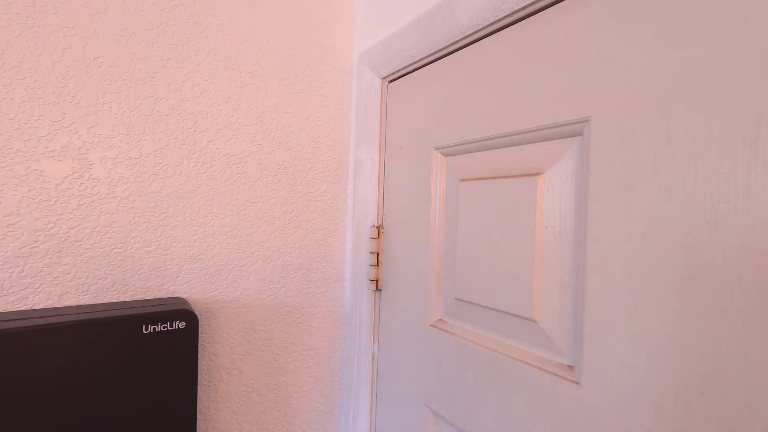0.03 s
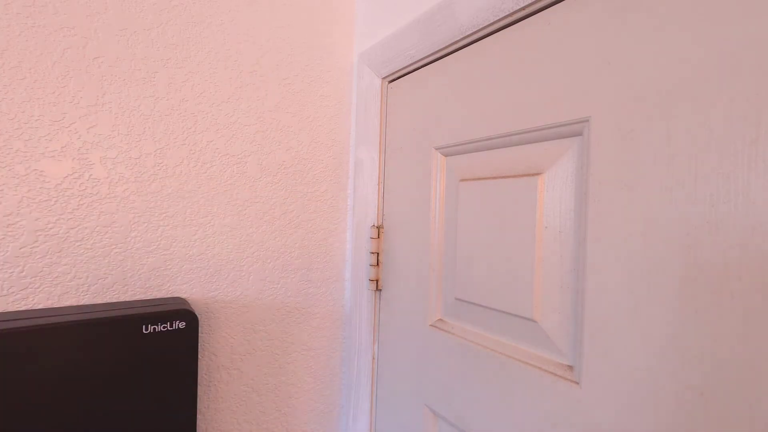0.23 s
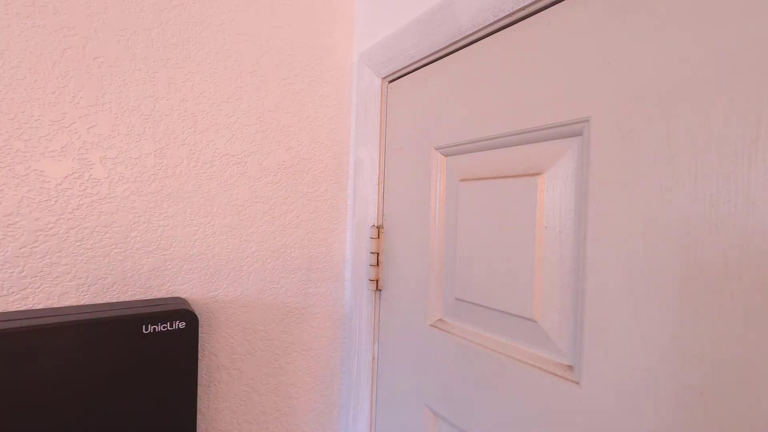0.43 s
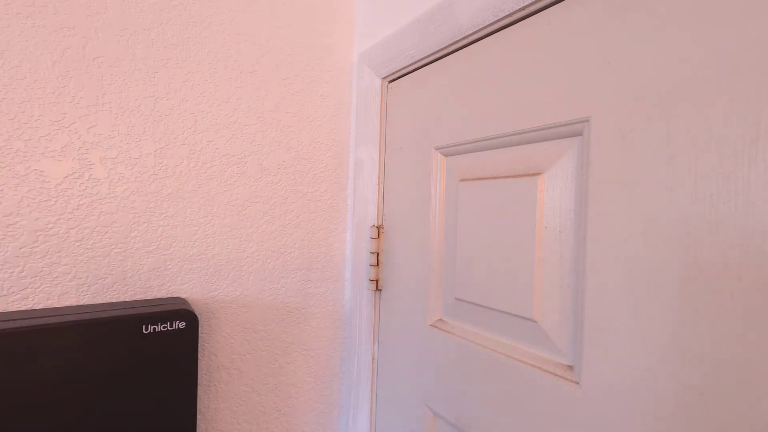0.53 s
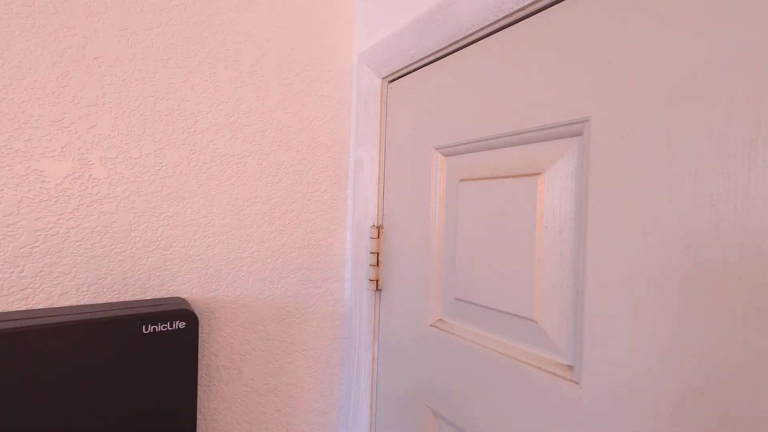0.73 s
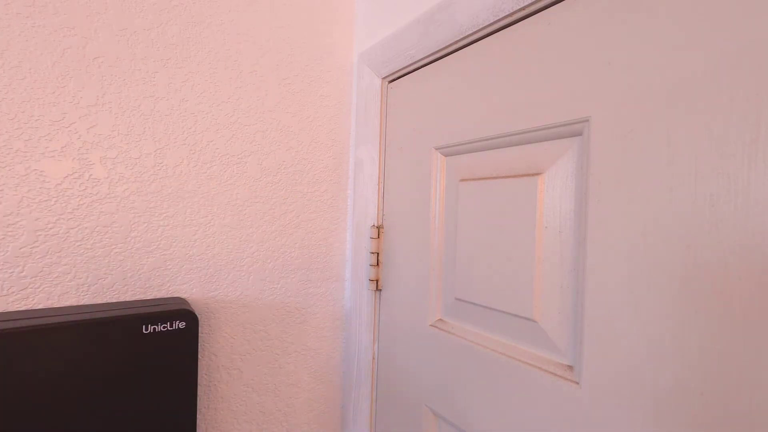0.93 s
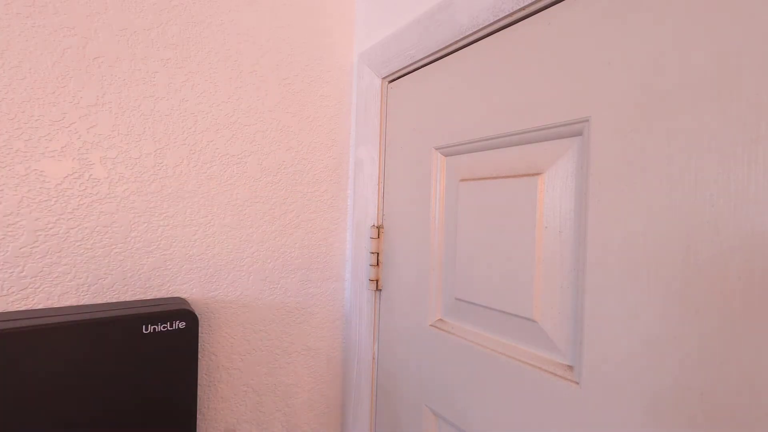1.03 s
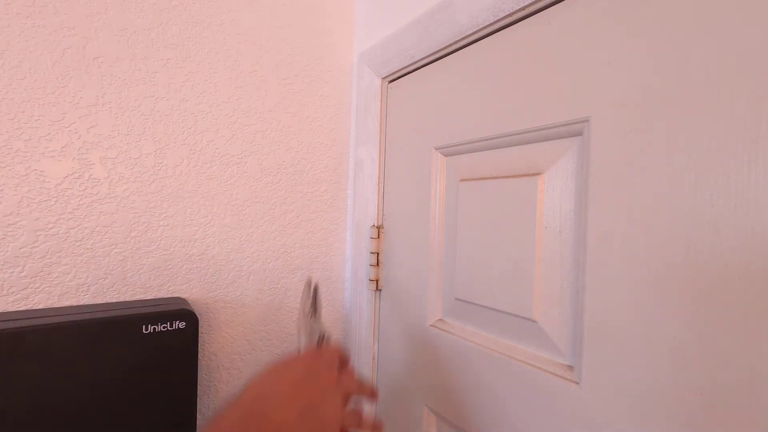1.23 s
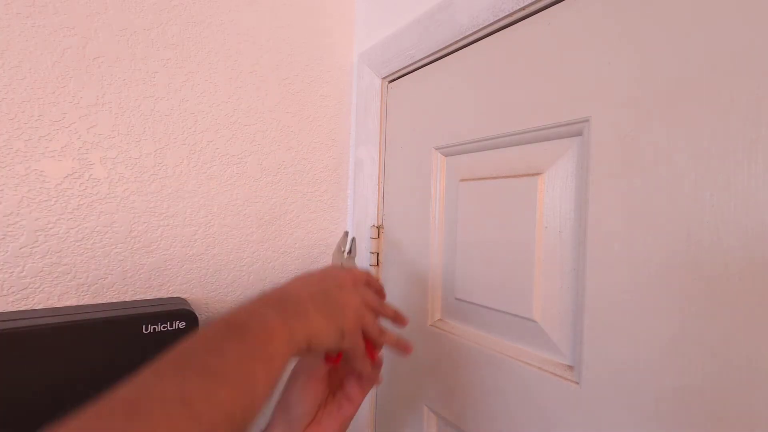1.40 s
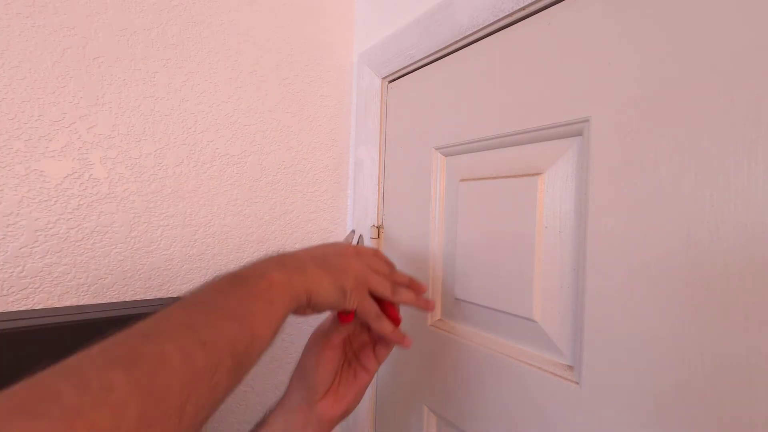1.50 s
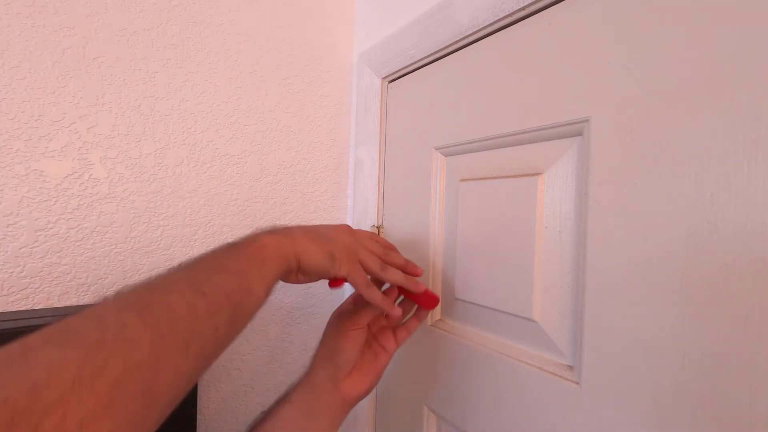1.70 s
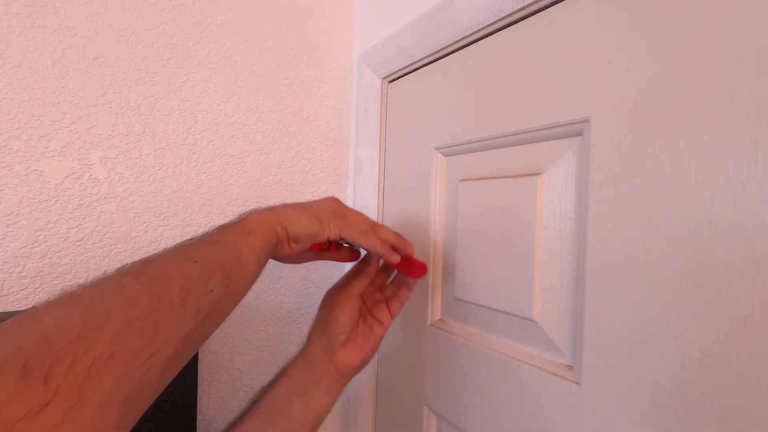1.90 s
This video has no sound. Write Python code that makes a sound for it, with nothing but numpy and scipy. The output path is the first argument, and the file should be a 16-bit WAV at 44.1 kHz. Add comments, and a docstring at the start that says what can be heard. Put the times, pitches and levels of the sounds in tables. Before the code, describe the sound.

A spring-loaded hand tool snaps with a hard clack at about 0.25 seconds. Wooden knocks and steel clinks rattle after it, settling with a short scrape around 0.5 seconds. Faint handling ticks follow. At 1.6 seconds the tool snaps again on a door hinge, brighter and more metallic, with one soft rebound click. The small room has a short echo and faint hiss and rumble.

```python
"""A small quiet room, where a spring-loaded hinge pin tool snaps twice over faint hiss and rumble.
The first snap is out of sight: the spring lets go and the parts slap together in a hard clack. Wooden
knocks, steel clinks and a short rattle follow, settle with a scrape and a groan, and leave a faint wash.
After a few handling ticks and a brief hiss the tool snaps on the door hinge, brighter, with one rebound.
The big hits layer the ringing modes of steel or wood with a crack of contact noise and the room's echo."""
import sys
import numpy as np
from scipy import signal
from scipy.fft import rfft, irfft
from scipy.io import wavfile

SR = 44100
rng = np.random.default_rng(int(sys.argv[2]) if len(sys.argv) > 2 else 0)


def to_wav(sig):
    """Store sig (one row per channel, or 1-D mono) as 16-bit WAV at the path in sys.argv[1].

    Samples outside -1..1 are clipped; the rate is SR.
    """
    pcm = np.clip(np.atleast_2d(sig), -1, 1) * 32767
    pcm = np.round(pcm).astype(np.int16)
    wavfile.write(sys.argv[1], SR, pcm.T)  # frames by channels


N = 85995

# How long the room rings. Each row: frequency in Hz, time to fall 60 dB (t60) in seconds.
ROOM_T60 = [(100, 0.0064), (500, 0.2561), (1200, 0.3178), (2500, 0.299), (3600, 0.26), (5100, 0.255),
            (6000, 0.28), (6700, .262), (7600, 0.262), (8500, 0.23), (11000, 0.2089), (15000, 0.167)]
# The colour of its echoes. Each row: frequency in Hz, relative gain in dB.
ROOM_COLOUR = [(100, -5), (700, 1), (1500, -1.5), (2500, -1), (4200, 1), (6000, 5.5), (6800, 2.5),
               (7600, 4), (10000, 3.5), (15000, -2)]

# The room's hiss. Each row: frequency in Hz, relative gain in dB.
HISS_COLOUR = [(20, 2.5), (60, -8), (150, -15.5), (400, -18.5), (1200, -17.5), (1900, -25.5), (2800, -18.5),
               (4000, -26.5), (10000, -31), (16000, -44)]
# The hiss ebbs slowly. Each row: time in seconds, level in dB.
HISS_FADER = [(0, -72), (.14, -77.5), (1.4, -82), (1.95, -82)]
# Deep rumble. Each row: frequency in Hz, relative gain in dB.
RUMBLE_COLOUR = [(1, 3), (8, -12), (25, -30.5), (60, -40), (120, -54), (400, -91)]
# The rumble grows as the hands approach. Each row: time in seconds, level in dB.
RUMBLE_FADER = [(0, -65), (.6, -64), (.66, -55), (1.3, -47.5), (1.95, -46)]
# The wash left by the first snap. Each row: frequency in Hz, relative gain in dB.
WASH_COLOUR = [(40, 1.5), (90, -1), (170, -7.5), (250, -13.5), (330, -8.5), (550, -7.5), (800, -13.5),
               (1150, -12), (1730, -6.5), (2800, -22.5), (4500, -18), (5400, -30.5), (11000, -41),
               (15000, -55.5)]
# The wash comes up quickly and lingers. Each row: time in seconds, level in dB.
WASH_FADER = [(.2, -100), (.36, -62.5), (.7, -67), (1.18, -76), (1.42, -87), (1.95, -100)]

# Handling ticks of the tool. Each row: start in seconds, relative level in dB.
TICKS = [(0.155, -60), (.499, -68.5), (.829, -56), (1.036, -65.5), (1.069, -54.5), (1.076, -59),
         (1.191, -58.5), (1.307, -66), (1.328, -62), (1.502, -63.5)]
# Contact noise of a tick. Each row: frequency in Hz, relative gain in dB.
TICK_COLOUR = [(200, -16), (900, -16.5), (1400, -7.5), (2100, 2.5), (2700, -2.5), (4300, -1.5),
               (7000, -13.5), (12000, -15), (16000, -21)]
# Soft bumps of the hands on the door. Each row: start in seconds, relative level in dB.
HAND_BUMPS = [(.09, -60.5), (0.801, -57), (1.604, -41.5), (1.694, -58.5)]
# The low thud of a bump or knock. Each row: frequency in Hz, relative gain in dB.
THUD_COLOUR = [(25, -16.5), (58, 0.5), (110, -6.5), (190, -4.5), (300, -13), (400, -19), (520, -16),
               (900, -26.5), (3000, -58.5)]
# Faint thin rings of the tool. Each row: start in seconds, pitch in Hz, level in dB, t60 in seconds.
THIN_RINGS = [(1.249, 1275, -78.5, 0.56), (1.77, 796, -86, 2.26)]

# The faint hiss just before the second snap. Each row: frequency in Hz, relative gain in dB.
PRE_SNAP_COLOUR = [(200, -27), (1000, -18), (1400, -5.5), (2100, 4.5), (2700, -12), (3400, -2),
                   (4500, -2.5), (6500, -17.5), (10000, -24), (16000, -36)]
# The groan of settling wood. Each row: frequency in Hz, relative gain in dB.
GROAN_COLOUR = [(60, -29), (140, -22.5), (190, -6.5), (310, 5.5), (400, -6.5), (500, 3.5), (700, -19),
                (2000, -43.5)]
# Wood scraping as the rattle settles. Each row: frequency in Hz, relative gain in dB.
SCRAPE_COLOUR = [(60, -33), (200, -17), (550, -23.5), (750, 1.5), (1000, 2.5), (1250, 3), (1600, -3),
                 (1950, -33.5), (3000, -25.5), (5000, -41.5), (12000, -58)]

# Loose steel parts landing. Each row: start in seconds, relative level in dB.
CLINKS = [(0.3066, -17), (0.3189, -22.5), (.333, -29.5), (.401, -41), (0.4236, -32)]
# The ring of the loose steel. Each row: frequency in Hz, relative level in dB, t60 in seconds.
STEEL_MODES = [(2680.5, -2.5, .025), (3760, 0, 0.025), (3890, -1, .025), (5750, -9, .025), (6730, -6, 0.02),
               (7170, -11, .025), (7560, -10, .025), (9200, -23, .025), (10090, -20, .02)]

# Knocks on wood, ending in a rattle. Each row: start in seconds, relative knock and thud levels in dB.
KNOCKS = [(.2425, -23, -25.5), (.254, -20.5, -32.5), (.2785, -13.5, -30.5), (.2808, -11, -29.5),
          (.2895, -15, -28.5), (.3075, -22.5, -43.5), (.3288, -19, -44.5), (.3545, -21.5, -45),
          (.369, -25.5, -68), (.392, -33, -73.5), (.411, -33, -72), (0.4476, -30.5, -67), (.469, -33, -70),
          (.502, -32.5, -58.5), (.510, -33, -60)]
# The ring of the wood. Each row: frequency in Hz, relative level in dB, t60 in seconds.
WOOD_MODES = [(787.1, -14, 0.075), (848.5, -3.5, 0.043), (1161, 1.5, 0.028), (1311.1, 3.5, 0.027),
              (1561.9, -6, 0.017), (2720, -17.5, 0.023)]
# Contact noise of a knock. Each row: frequency in Hz, relative gain in dB.
KNOCK_COLOUR = [(100, -16), (250, -10), (550, -5.5), (750, -1.5), (1550, 11), (2100, -11.5), (4000, -22),
                (8000, -29), (16000, -55.5)]

# The parts slapping together in the first snap. Each row: start in seconds, relative level in dB.
CLACKS = [(0.2404, -18.5), (0.2418, -8.5), (.2428, -6.5), (.2460, -15.5), (0.2591, -18.5), (0.2753, -18.5)]
# The ring of those parts. Each row: frequency in Hz, relative level in dB, t60 in seconds.
CLACK_MODES = [(756.2, -14, .04), (1280, -12.5, .04), (1603.3, -8, 0.094), (1925.4, -8, 0.044),
               (2381, 3, 0.048), (2598, 0.5, .05), (2754.3, -2, .045), (3144.8, 3, .045),
               (3372, -11.5, .04), (4937, -13.5, 0.058), (5255, -11.5, .025), (9362, -27, .03)]
# Contact noise of a clack. Each row: frequency in Hz, relative gain in dB.
CLACK_COLOUR = [(100, -14), (400, -14.5), (900, -9), (1500, 0.5), (2050, -5.5), (2450, 3.5), (2850, 2.5),
                (3250, 3), (3850, -6.5), (4400, -18.5), (5800, -13), (7600, -19.5), (8400, -28.5),
                (9400, -24), (16000, -44)]

# The catch lets go, then the tool strikes the hinge. Each row: start in seconds, relative level in dB.
HINGE_HITS = [(1.6034, -23), (1.6054, -4.5)]
# The ring of tool against hinge. Each row: frequency in Hz, relative level in dB, t60 in seconds.
HINGE_MODES = [(1394, -17, 0.038), (1671.2, -2.5, 0.0342), (2131, -2, 0.024), (3023, -8.5, .02),
               (3413, -4, 0.025), (4206.5, 2.5, 0.014), (4570, -1, .014), (5268, 0, 0.018),
               (5646, 0, 0.013), (6589, -1.5, 0.015), (7020, -2.5, 0.011), (7504, -2.5, 0.022),
               (11780, -3.5, 0.013), (12640, -7, 0.013), (15400, -4.5, 0.006)]
# Contact noise of that strike. Each row: frequency in Hz, relative gain in dB.
HINGE_COLOUR = [(100, -33), (500, -25.5), (1000, -22.5), (1300, -13.5), (1700, -1.5), (2150, -4.5),
                (2500, -8.5), (3400, 5), (3800, -6), (4400, 1.5), (5100, 0.5), (5900, 2), (7700, 3.5),
                (8500, -8.5), (12000, -8), (16000, -9)]
# The rebound's two quick contacts. Each row: start in seconds, relative level in dB.
REBOUND_HITS = [(1.6569, -22), (1.6600, -29)]
# Contact noise of the rebound. Each row: frequency in Hz, relative gain in dB.
REBOUND_COLOUR = [(100, -41), (900, -40), (1300, -10), (2500, -7.5), (3400, 1), (4500, 1), (6000, -4),
                  (8000, -8), (16000, -20)]


def amp(db):
    """Turns decibels into a gain."""
    return 10 ** (np.asarray(db) / 20)


def unit(x):
    """Scales a sound to an energy of one."""
    return x / np.sqrt(np.sum(x ** 2) + 1e-20)


def read(points, hz):
    """Reads a table on a log-frequency axis."""
    f, value = np.transpose(points)
    return np.interp(np.log(hz + 1), np.log(f + 1), value)


def add(mix, start_s, sound):
    """Drops a sound into the mix at its cue."""
    part = mix[round(start_s * SR):][:len(sound)]
    part += sound[:len(part)]


def decay(t, t60):
    """A tail that falls 60 dB in t60 seconds."""
    return np.exp(-np.log(1000) * t / t60)


def noise(colour):
    """A scene-long bed of coloured noise, rms about one."""
    gain = amp(read(colour, np.fft.rfftfreq(N, 1 / SR)))
    return irfft(rfft(rng.standard_normal(N)) * gain, N) / np.sqrt(np.mean(gain ** 2))


def burst(colour, t60, rise_s):
    """A puff of coloured noise that rises quickly and dies away."""
    t = np.arange(SR // 2) / SR
    puff = rng.standard_normal(len(t)) * (1 - np.exp(-t / rise_s)) * decay(t, t60)
    log_gain = np.log(amp(read(colour, abs(np.fft.fftfreq(len(t), 1 / SR)))))
    # A minimum-phase EQ, so nothing sounds ahead of the attack.
    eq = np.fft.ifft(np.exp(np.conj(signal.hilbert(log_gain)))).real
    return signal.fftconvolve(puff, unit(eq))[:len(t)]


def ring(modes, low_hz, rise_s, detune=0, order=4):
    """Dying modes of a struck body too small to radiate below low_hz."""
    t = np.arange(SR // 2) / SR
    shifts = 1 + detune * rng.standard_normal(len(modes))
    tone = sum(amp(db) * np.sin(2 * np.pi * hz * shift * t) * decay(t, t60)
               for (hz, db, t60), shift in zip(modes, shifts))
    attack = 1 - np.exp(-t / rise_s)
    tone = tone * attack / np.linalg.norm(amp([db for _, db, _ in modes]))
    return signal.sosfilt(signal.butter(order, low_hz, "high", fs=SR, output="sos"), tone)


def chatter(t60, hits_per_s):
    """One firm contact followed by a dying flurry of tiny ones."""
    t = np.arange(SR // 10) / SR
    hits = rng.standard_normal(len(t)) * (rng.random(len(t)) < hits_per_s / SR)
    hits[0] = 2
    return unit(hits * decay(t, t60))


def room(direct, wet_db, gap_s):
    """Direct sound plus dense reflections that build up over gap_s and die band by band."""
    t = np.arange(SR) / SR
    echoes = rng.choice([-1., 1.], SR) * (rng.random(SR) < 1 / 8)
    hz, frame_s, bands = signal.stft(echoes, SR, nperseg=256)
    bands = bands * decay(frame_s, read(ROOM_T60, hz)[:, None]) * amp(read(ROOM_COLOUR, hz))[:, None]
    build_up = 1 - np.exp(-(t / gap_s) ** 2)
    tail = signal.istft(bands, SR, nperseg=256)[1][:SR] * build_up
    return direct + amp(wet_db) * signal.fftconvolve(direct, unit(tail))[:N]


def background():
    """A faint wash lingers after the first snap and sinks into the room's hiss and deep rumble."""
    t = np.arange(N) / SR
    beds = [(WASH_COLOUR, WASH_FADER), (HISS_COLOUR, HISS_FADER), (RUMBLE_COLOUR, RUMBLE_FADER)]
    return sum(noise(colour) * amp(np.interp(t, *np.transpose(fader))) for colour, fader in beds)


def handling():
    """The tool ticks and rings faintly, and the hands bump the door."""
    ticks, soft = np.zeros((2, N))
    for s, db in TICKS:
        add(ticks, s, amp(db - 6.5) * burst(TICK_COLOUR, t60=0.026, rise_s=0.0017))
    for s, db in HAND_BUMPS:
        add(soft, s, amp(db - 4) * burst(THUD_COLOUR, t60=0.092, rise_s=0.0071))
    for s, hz, db, t60 in THIN_RINGS:
        add(soft, s, amp(db) * ring([(hz, 0, t60)], low_hz=297, rise_s=0.0032))
    return room(ticks, wet_db=-2.5, gap_s=0.006) + room(soft, wet_db=-23, gap_s=0.006)


def pre_snap_hiss(start_s=1.56, end_s=1.604, peak_db=-56.5, rise_db_per_s=169.5, fade_in_s=0.028):
    """A faint hiss swells just before the second snap."""
    t = np.arange(N) / SR
    swell = amp(peak_db + rise_db_per_s * np.minimum(t - end_s, 0))
    gate = np.clip((t - start_s) / fade_in_s, 0, 1) * (t < end_s)
    return noise(PRE_SNAP_COLOUR) * swell * gate


def wood_groan(start_s=0.47, level_db=-52):
    """The wood gives a low, soft groan as the rattle ends."""
    groan = np.zeros(N)
    add(groan, start_s, amp(level_db) * burst(GROAN_COLOUR, t60=0.557, rise_s=0.0361))
    return groan


def wood_scrape(start_s=0.35, peak_s=0.4825, peak_db=-36, rise_db=12.5, fall_db_per_s=305):
    """Dense little slips on the wood swell, then die quickly."""
    t = np.arange(N) / SR
    swell_db = rise_db * (t - peak_s) / (peak_s - start_s)
    release_db = fall_db_per_s * (peak_s - t)
    level = amp(peak_db + np.minimum(swell_db, release_db)) * (t > start_s)
    slips = rng.standard_normal(N) * (rng.random(N) < 1500 / SR)  # about 1500 slips a second
    eq = amp(read(SCRAPE_COLOUR, np.fft.rfftfreq(N, 1 / SR)))
    grain = unit(irfft(rfft(slips) * eq, N)) * np.sqrt(N)
    return room(level * grain, wet_db=-5, gap_s=0.0052)


def steel_clinks():
    """Loose steel chatters as it lands, so its ring is rough and brief."""
    clinks = np.zeros(N)
    for s, db in CLINKS:
        steel = ring(STEEL_MODES, low_hz=1504, rise_s=0.00054, detune=0.005)
        add(clinks, s, amp(db) * signal.fftconvolve(steel, chatter(t60=0.04, hits_per_s=1200)))
    return room(clinks, wet_db=-11, gap_s=0.006)


def wood_knocks():
    """Each knock lands on a slightly different spot, detuning the wood's ring, over a low thud."""
    knocks, thuds = np.zeros((2, N))
    for s, db, thud_db in KNOCKS:
        add(knocks, s, amp(db) * ring(WOOD_MODES, low_hz=573, rise_s=0.00082, detune=0.035))
        add(knocks, s, amp(db - 10.5) * burst(KNOCK_COLOUR, t60=0.047, rise_s=0.00085))
        add(thuds, s, amp(thud_db - 7) * burst(THUD_COLOUR, t60=0.15, rise_s=0.012))
    return room(knocks, wet_db=-4, gap_s=0.0037) + room(thuds, wet_db=-7.5, gap_s=0.0066)


def spring_clack():
    """The spring lets go and the parts slap together; the crack fills the room more than the ring."""
    body, crack = np.zeros((2, N))
    for s, db in CLACKS:
        add(body, s, amp(db + 0.5) * ring(CLACK_MODES, low_hz=612, rise_s=0.00072))
        add(crack, s, amp(db - 5) * burst(CLACK_COLOUR, t60=0.028, rise_s=0.00073))
    return room(body, wet_db=-8.5, gap_s=0.013) + room(crack, wet_db=-2.5, gap_s=0.013)


def hinge_snap():
    """Steel strikes the hinge with a bright ring and crack, then rebounds with a softer, duller click."""
    body, crack = np.zeros((2, N))
    for s, db in HINGE_HITS:
        add(body, s, amp(db + 1) * ring(HINGE_MODES, low_hz=1256, rise_s=0.00026, order=8))
        add(crack, s, amp(db - 6) * burst(HINGE_COLOUR, t60=0.01335, rise_s=0.00031))
    for s, db in REBOUND_HITS:
        add(body, s, amp(db) * burst(REBOUND_COLOUR, t60=0.01945, rise_s=0.00047))
    return room(body, wet_db=-14.5, gap_s=0.0071) + room(crack, wet_db=1.5, gap_s=0.0034)


def scene():
    """An almost mono mix with very faint stereo width."""
    snaps = spring_clack() + hinge_snap()
    clatter = wood_knocks() + wood_scrape() + wood_groan() + steel_clinks()
    mono = snaps + clatter + handling() + pre_snap_hiss() + background()
    spread = room(mono, wet_db=-1, gap_s=0.003) - mono
    side = amp(-40) * spread
    return np.array([mono + side, mono - side])


def record(dry):
    """A steep low-pass trims the air above 16.1 kHz."""
    low_pass = signal.firwin(255, 16100, window=("kaiser", 9), fs=SR)
    return signal.oaconvolve(dry, low_pass[None], "same")


dry = scene()
out = record(dry)
to_wav(out)
```